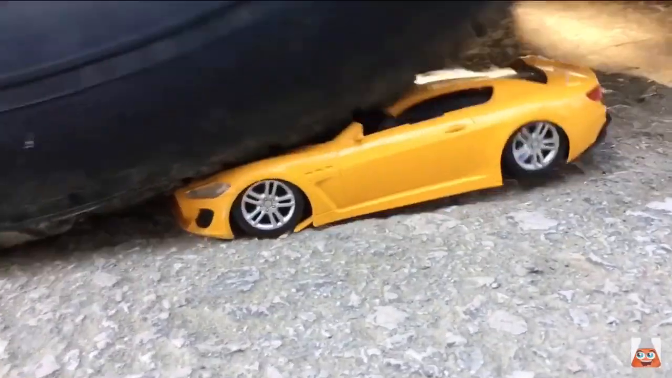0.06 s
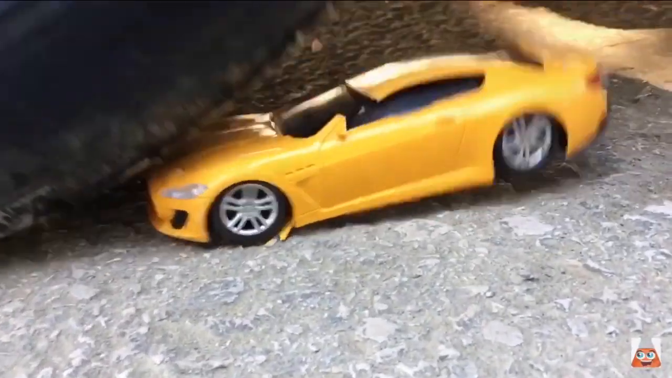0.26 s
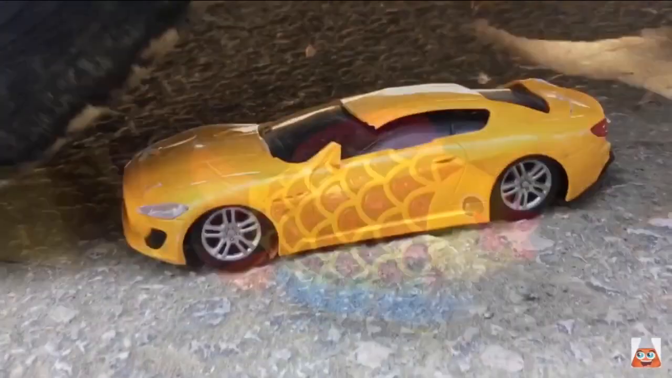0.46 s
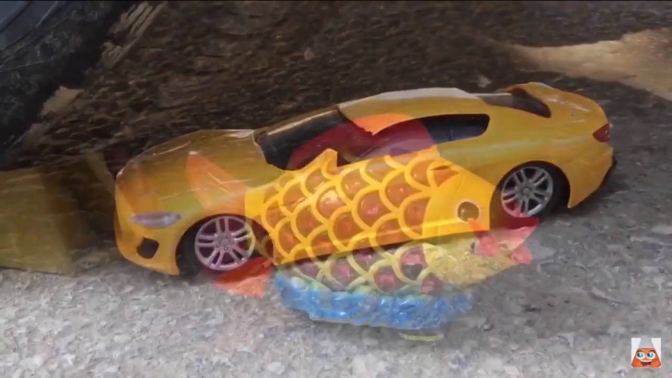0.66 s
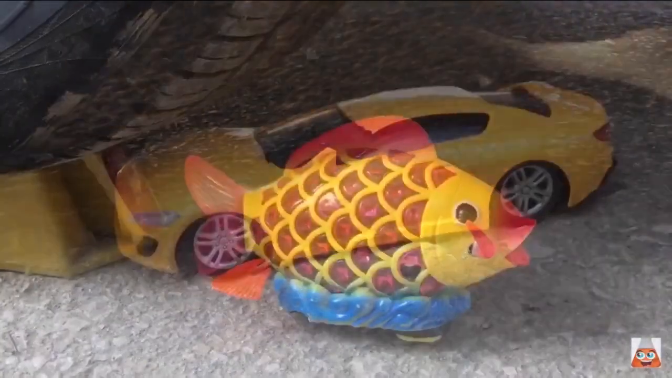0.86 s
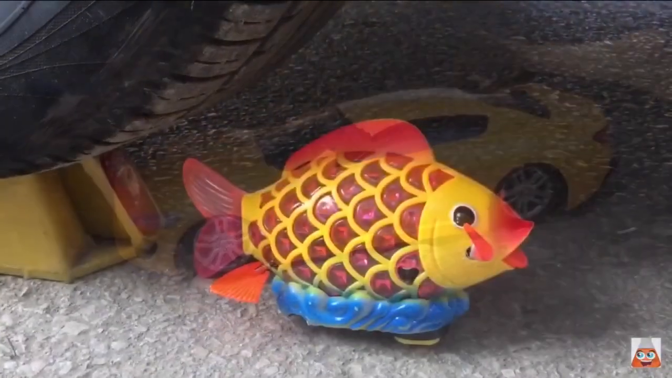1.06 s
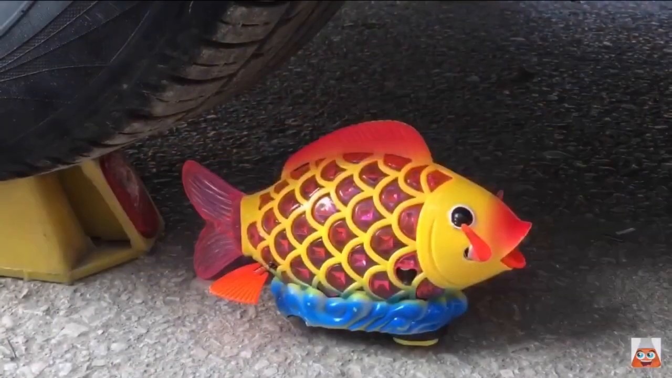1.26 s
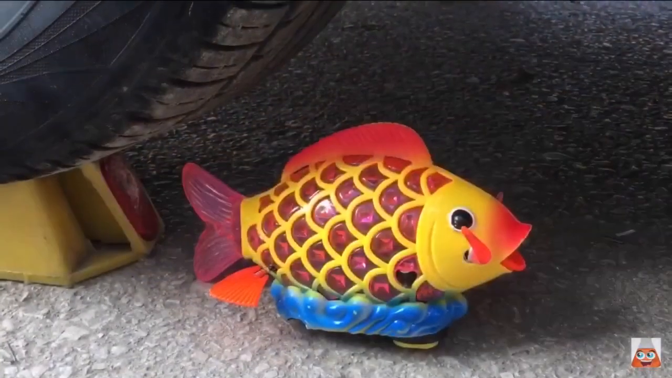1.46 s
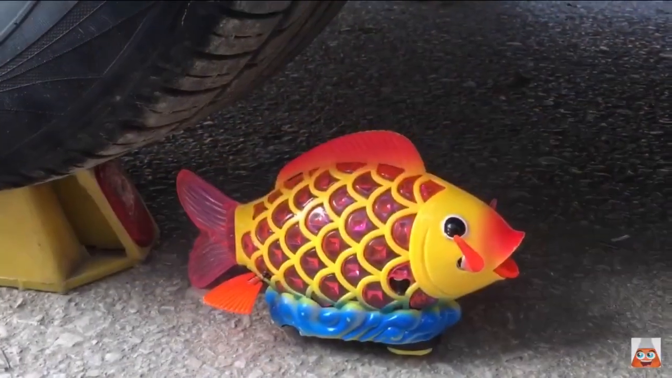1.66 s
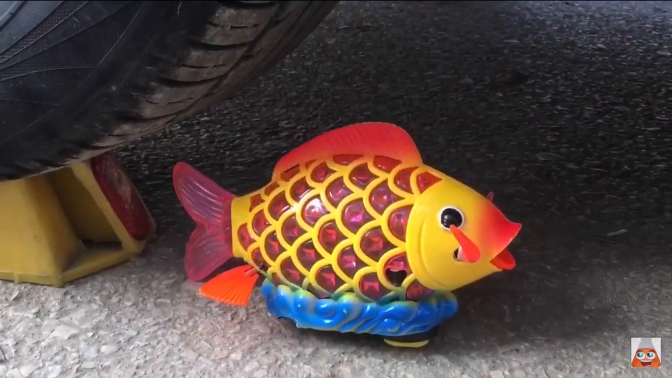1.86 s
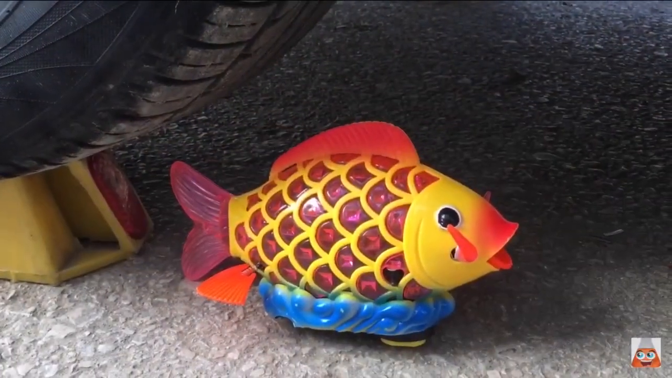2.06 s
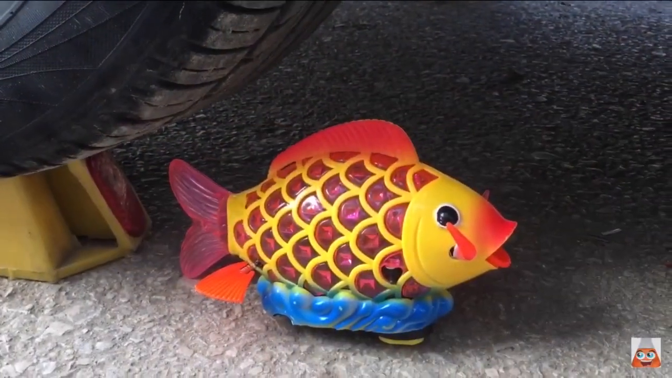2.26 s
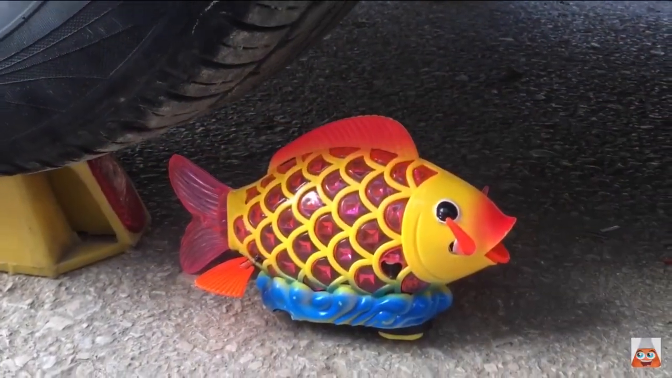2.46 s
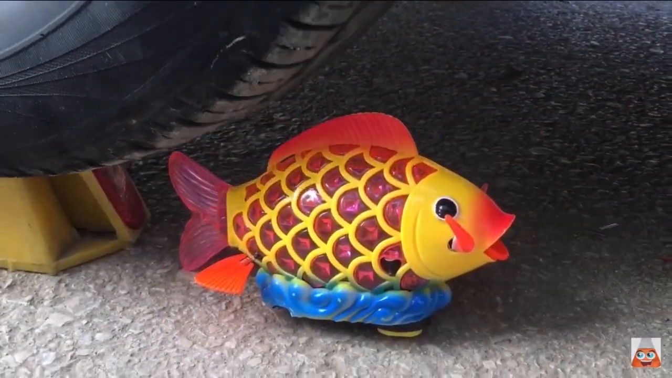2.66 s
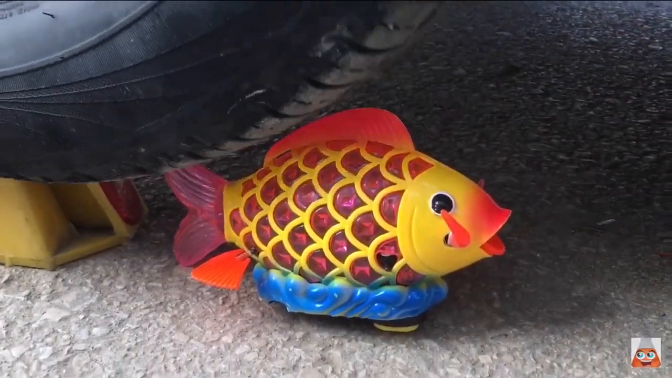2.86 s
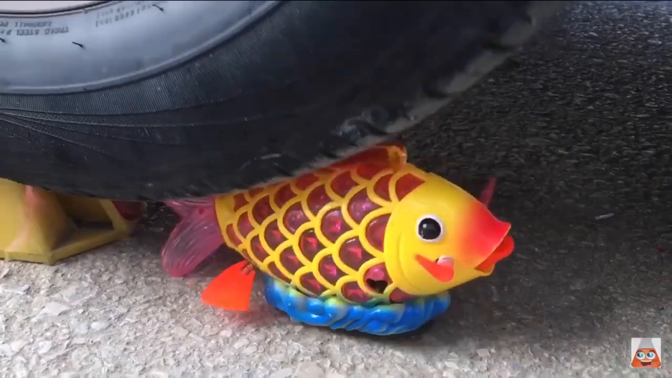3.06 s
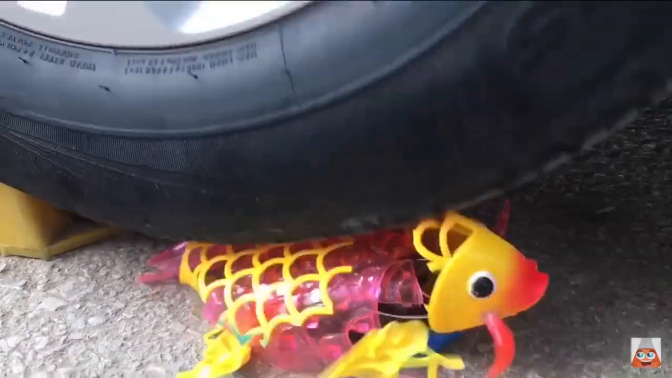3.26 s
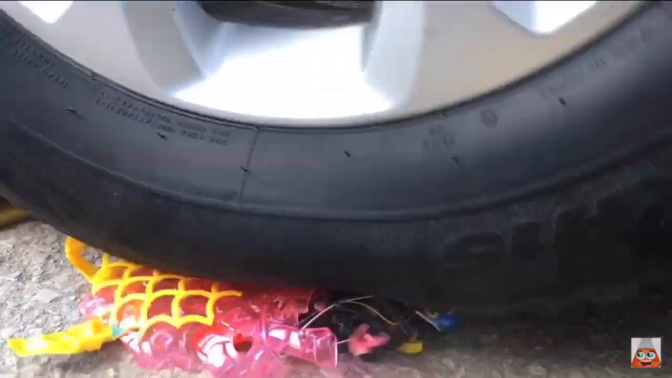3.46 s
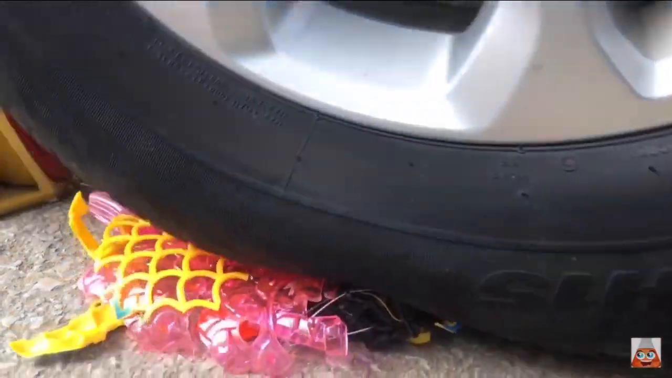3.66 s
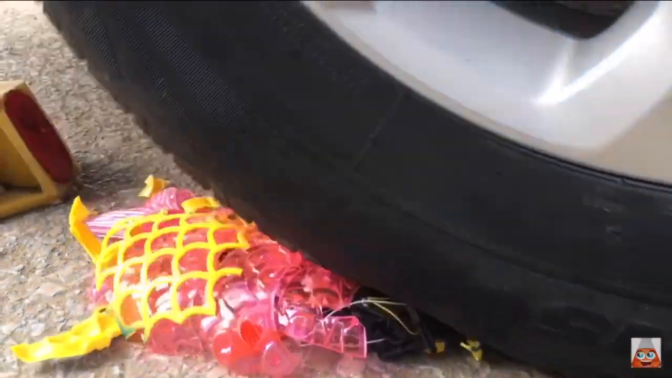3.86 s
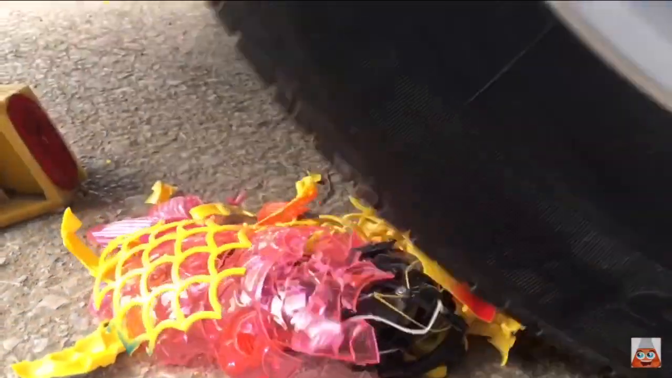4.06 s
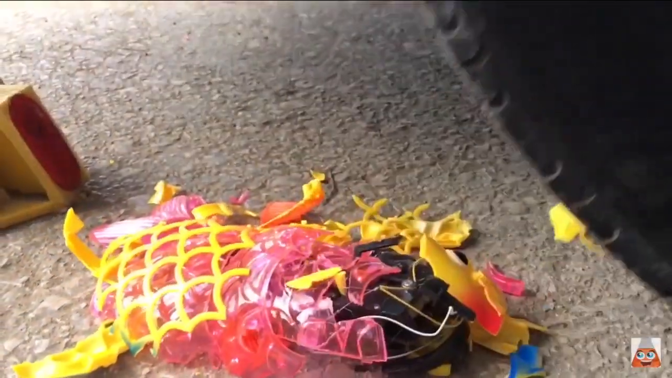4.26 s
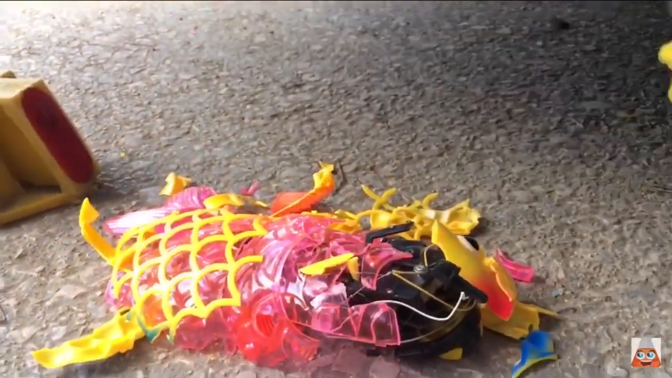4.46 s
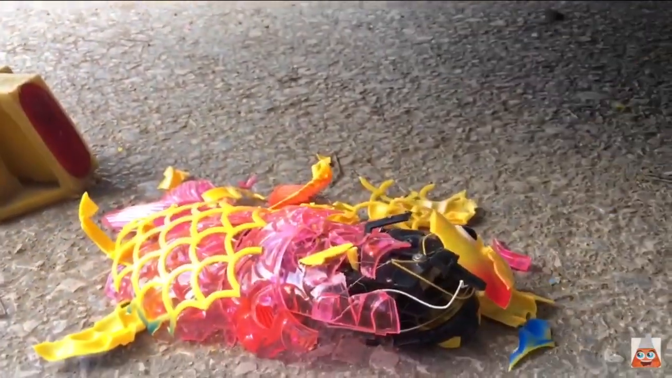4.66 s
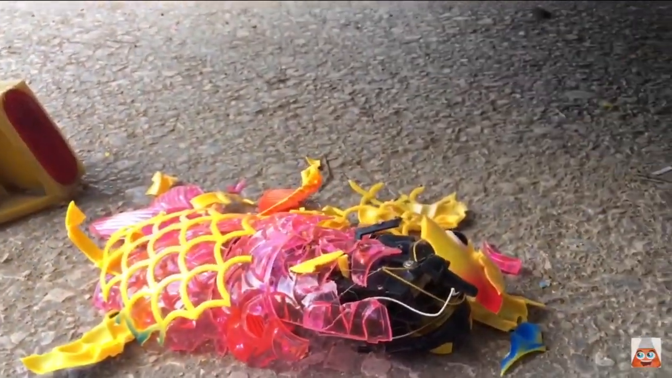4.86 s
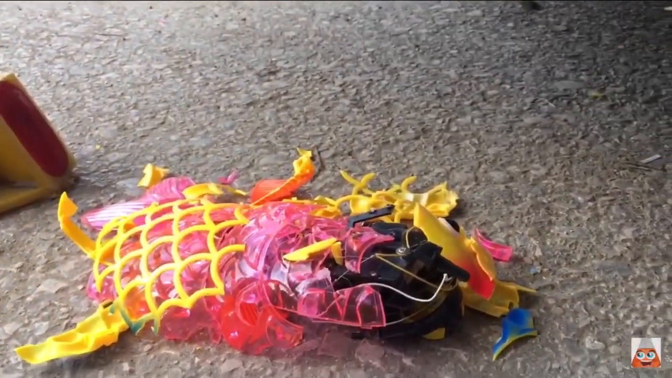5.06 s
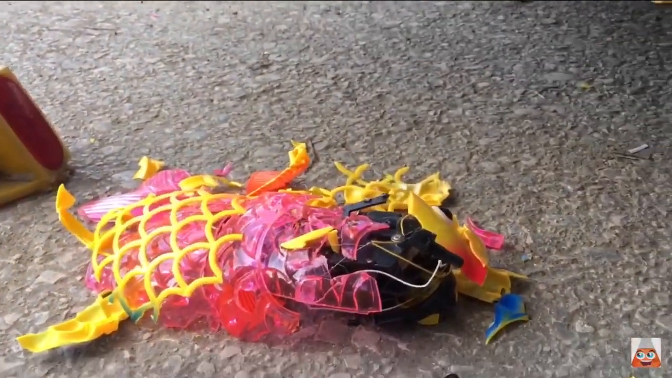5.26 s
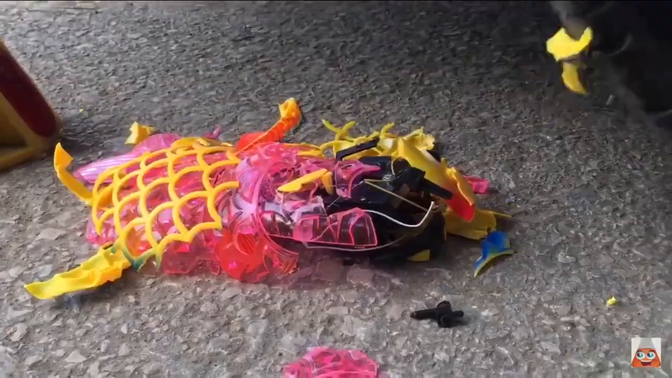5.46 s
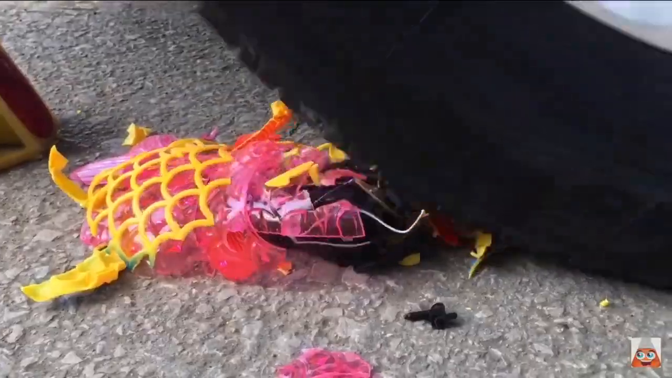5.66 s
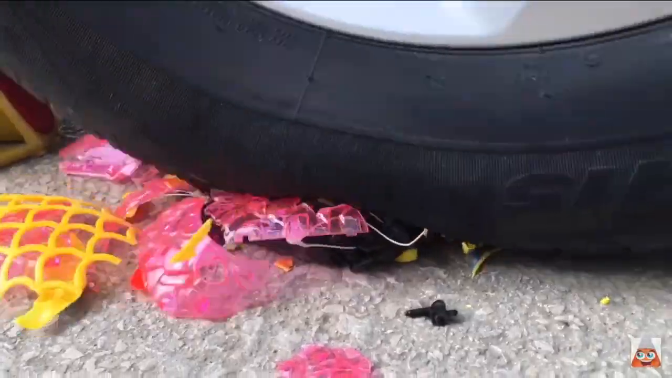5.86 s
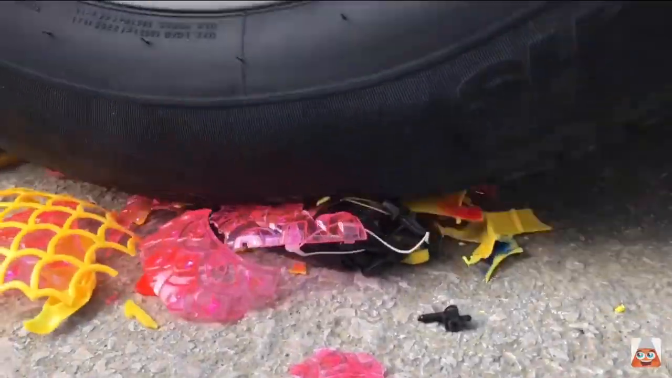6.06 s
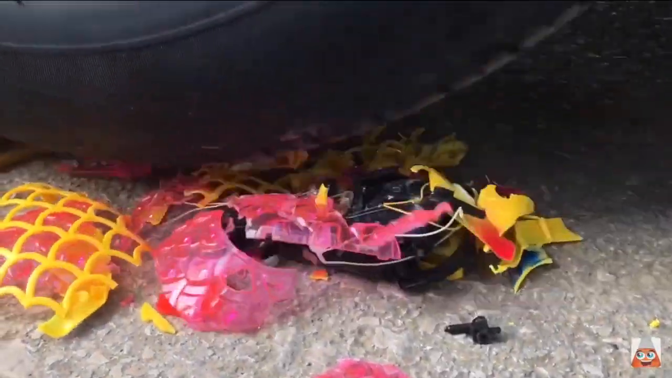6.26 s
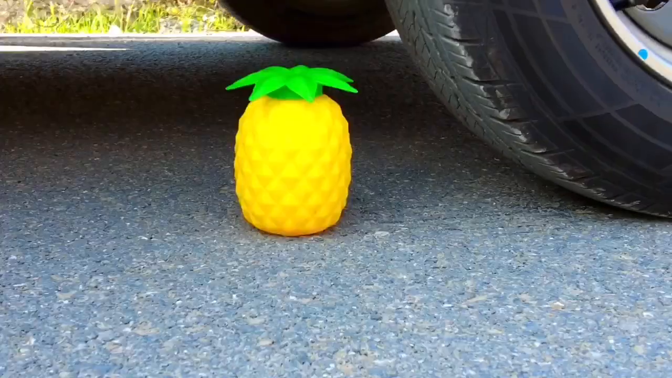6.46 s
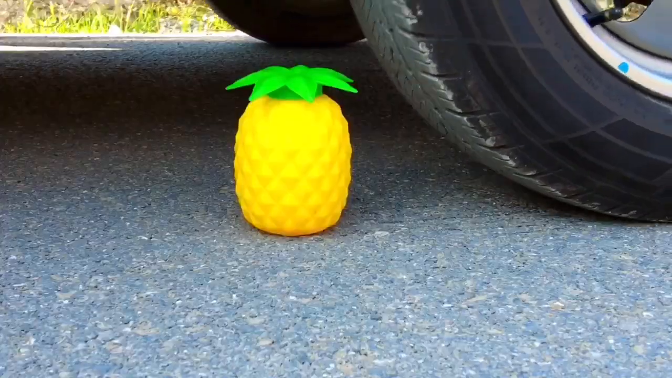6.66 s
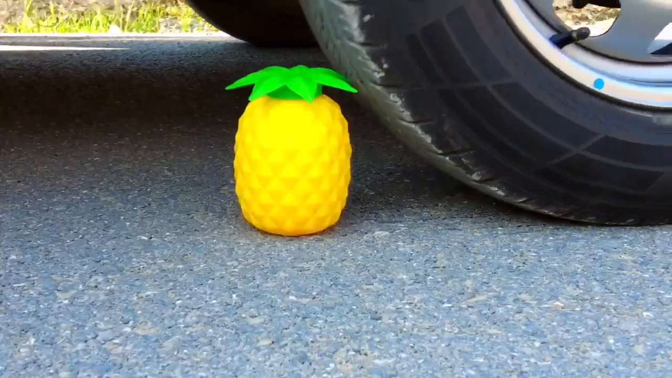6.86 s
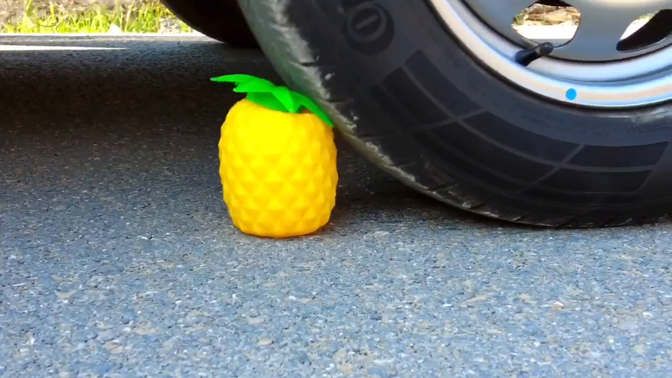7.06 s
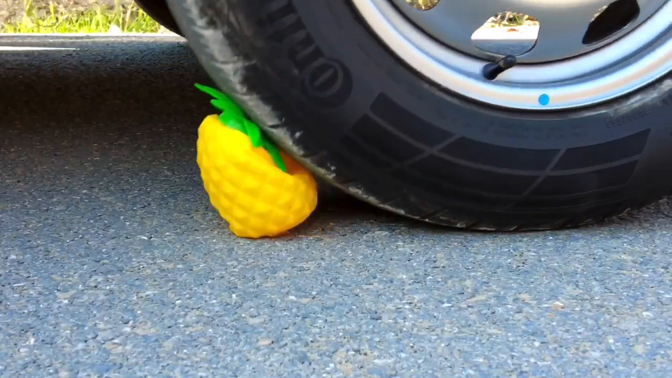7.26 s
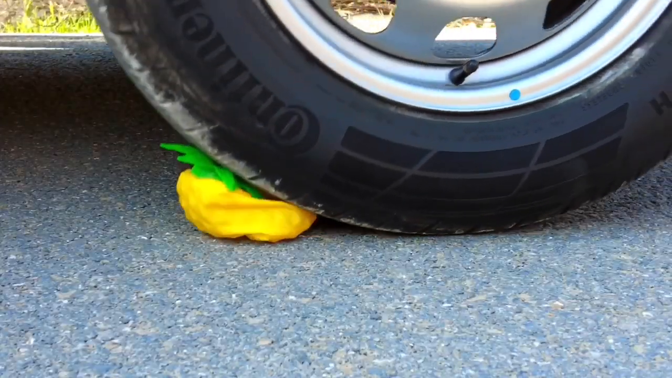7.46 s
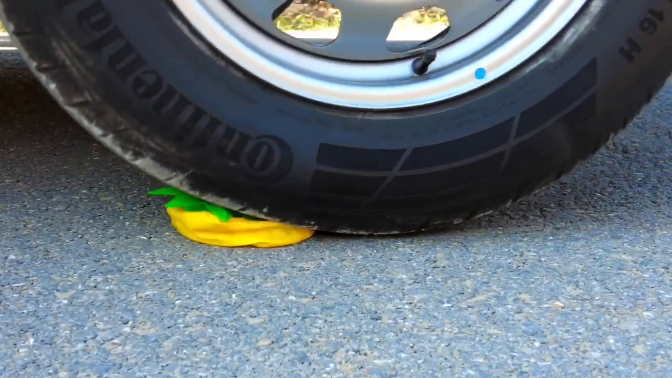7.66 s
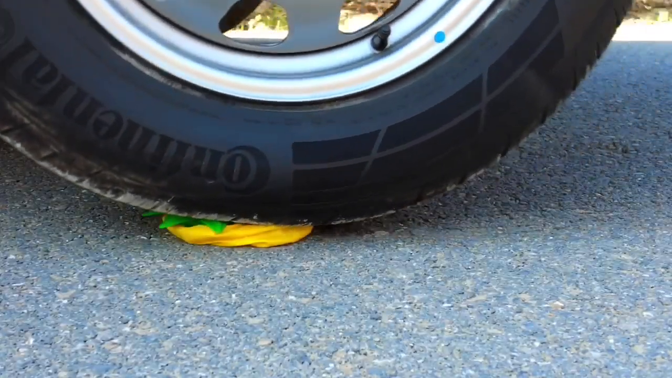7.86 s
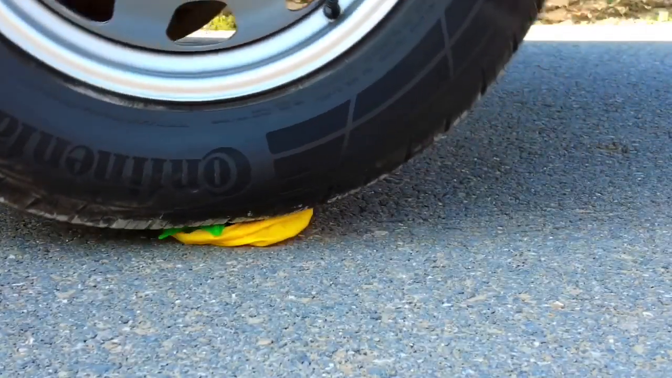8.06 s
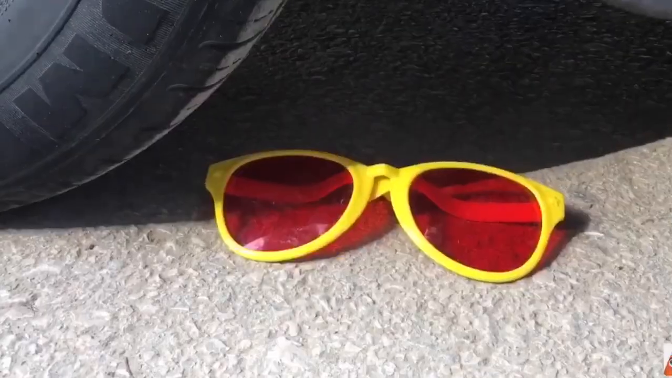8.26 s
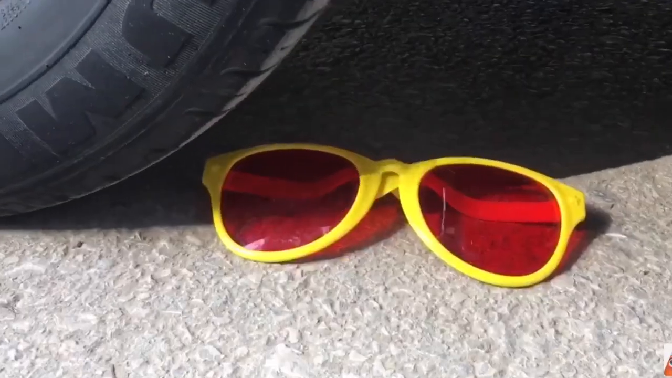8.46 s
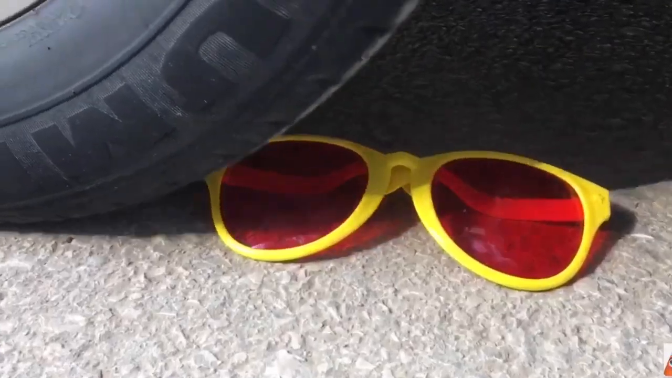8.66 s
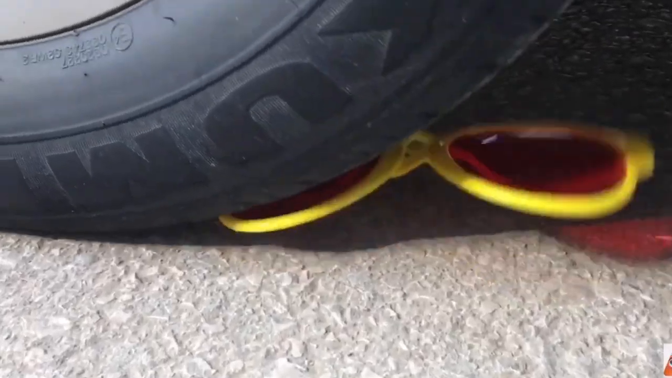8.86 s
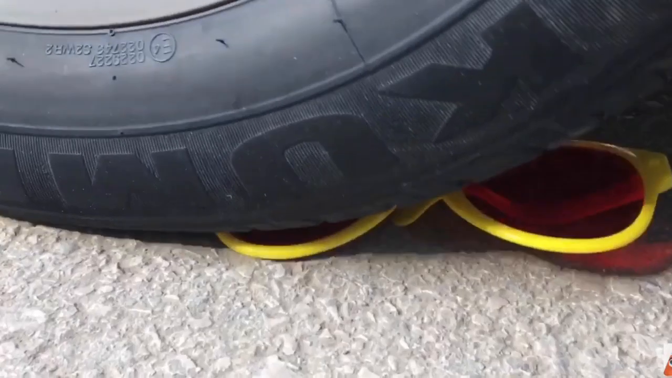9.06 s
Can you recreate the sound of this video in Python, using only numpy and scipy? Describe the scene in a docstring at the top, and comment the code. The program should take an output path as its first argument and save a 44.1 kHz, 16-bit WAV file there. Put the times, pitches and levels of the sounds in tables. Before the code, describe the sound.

A diesel idles with rapid, rattling knocks, close and mono, under low wind buffeting. At 0-0.35 s brittle plastic snaps sharply, with a small tick near 0.6. Engine clatter and soft wind thumps continue until 2.84, when a hollow plastic toy collapses: dense, overloaded cracks, low puffs of air, splinters and ringing chips until 3.45. The crunching thins through 4 s into sparse ticks; the engine is fainter, then returns with wind. At 5.32 a very faint high squeal falls, heavy wind thumps hit, and from 5.62 to 6.25 wreckage is crunched again. From 6.32 a quiet, wider roadside hums; a soft hollow toy gives dull pops at 6.87-7.4, strongest at 7.25, with small creaks and a faint hiss near 7.55. At 8.22 a louder, closer engine rattles; plastic glasses tick at 8.57, crack at 8.89, then snap violently with a huge air thump at 9.03-9.12, almost immediately cut off.

```python
"""An idling diesel clatters beside a mono microphone while a car tyre creeps over brittle plastic toys.
Five sections joined by short fades. Engine: noise gated by firings. Shells: noise bursts through resonances,
ringing shards, falling puffs and random debris. Wind buffets and shoves; loud peaks clip in overload.
The fourth section is a quiet stereo roadside: a hollow soft toy pops and crumples over a far hum."""
import sys
import numpy as np
from scipy import signal
from scipy.fft import rfft, irfft, next_fast_len
from scipy.io import wavfile
from scipy.ndimage import uniform_filter1d, map_coordinates

SR = 44100
rng = np.random.default_rng(int(sys.argv[2]) if len(sys.argv) > 2 else 0)


def wav_out(sig):
    """Save sig, one row per channel (or a flat mono array), as 16-bit PCM at SR to the path in sys.argv[1]."""
    wavfile.write(sys.argv[1], SR, np.round(np.clip(np.atleast_2d(sig).T, -1, 1) * 32767).astype(np.int16))


N = 402191

# Sections of the scene: start_s, end_s, fade_in_s, fade_out_s
SECTIONS = [(0, 3.45, 0.0016, .04), (3.419, 5.318, 0.045, 0.05), (5.321, 6.325, .004, .03),
            (6.323, 8.22, 0.11, 0.049), (8.221, 9.536, 0.091, .01)]
# Snapping shells: start_s, split_level_db, body_db (above split), body_hz, t60_s (limited in cracks)
CRACKS = [(0.027, -13.5, -11.5, 590, 0.015), (.062, -17.5, -6, 2296, 0.035), (.073, -12, -5.5, 1290, 0.012),
          (.193, -22, 4, 2195, .03), (0.2306, -0.5, -8, 1492, 0.0057), (0.262, -20, 0, 2155, .06),
          (.272, -20, 3.5, 1450, .02), (.321, -14, -9.5, 520, 0.032), (.592, -25, 5, 2300, .06),
          (2.8397, -10, -17, 2190, 0.017), (2.8495, -13.5, -26, 1448, 0.045), (2.863, -12, -11, 964, 0.031),
          (2.875, -6.5, -2, 1550, 0.087), (2.881, 9.5, -11.5, 2055, 0.017), (2.9367, 0, -7, 745, 0.083),
          (2.9724, -4, -3, 994, 0.0066), (3.002, -5, -6.5, 917, 0.048), (3.009, -4.5, -3.5, 1845, 0.032),
          (3.0516, 15.5, -8.5, 430, 0.011), (3.074, -10, -10.5, 2140, 0.027),
          (3.0828, -9, 4.5, 1073, 0.027), (3.1107, 0, -5.5, 1760, 0.041), (3.1496, -8, -16, 2150, 0.045),
          (3.166, -4, -4.5, 2303, 0.035), (3.1783, -4.5, -9, 874, 0.097), (3.2074, -6, -12, 2163, 0.044),
          (3.224, -12, -7, 603, .028), (3.234, -8, -15, 309, .021), (3.248, -1, -12, 370, 0.027),
          (3.2565, -6.5, 1, 302, .013), (3.271, -6.5, -10, 2340, .055), (3.298, -4, -8.5, 900, 0.067),
          (3.3145, -5.5, -10, 306, .05), (3.327, -4.5, -8.5, 600, 0.064), (3.342, -5, -10.5, 1995, 0.084),
          (3.363, -8, -12, 1985, 0.098), (3.3826, -5.5, -5.5, 541, 0.041), (3.3918, -6, -16, 958, 0.11),
          (3.4031, -7, -8, 571, 0.046), (3.474, -26, 4, 800, .01), (3.491, -11, -32, 733, .0094),
          (3.511, -5.5, -7.5, 674, 0.01), (3.5486, -12, 0, 656, 0.011), (3.559, -21, 8.5, 750, .012),
          (3.5816, -20.5, -5, 727, 0.065), (3.6113, -6, -12.5, 298, .014), (3.6592, -19, -6.5, 2320, 0.024),
          (3.7107, -2.5, -8, 848, .014), (3.7367, -16, -34, 1650, 0.02), (3.7658, -0.5, -3, 436, 0.016),
          (3.8, -7.5, -12.5, 900, 0.0042), (3.8145, -24.5, -6, 2300, .069), (3.91, -7.5, -34, 2290, 0.018),
          (3.934, -19, -25, 2290, .013), (3.944, -18, -17.5, 2200, 0.0076),
          (4.1268, -22.5, -15, 2140, 0.038), (4.3515, -22.5, -18, 300, 0.035),
          (4.4122, -18.5, -6.5, 1120, 0.018), (4.4716, -19.5, -7.5, 2213, 0.0046),
          (4.992, -20, -5, 1930, 0.05), (5.1281, -13, 14, 680, .02), (5.6227, -10, -9.5, 301, 0.14),
          (5.6452, 6, -10, 300, .012), (5.671, 2.5, -4.5, 298, 0.012), (5.6792, 8, -13, 296, 0.0062),
          (5.689, -6.5, -7, 307, 0.012), (5.7026, -6.5, -4, 305, 0.018), (5.7507, -14.5, -10.5, 2307, .077),
          (5.761, -4.5, -17, 876, 0.027), (5.8, -14, -24, 379, 0.1), (5.818, -4.5, -6.5, 855, 0.013),
          (5.8592, -3.5, 5, 650, 0.011), (5.8897, -6, 0, 936, 0.011), (5.8986, -3.5, -10, 650, .0073),
          (5.9154, -10, 1.5, 684, 0.029), (5.9334, -6.5, -16.5, 670, 0.014), (5.971, -3.5, 0, 291, 0.007),
          (5.9857, -15.5, -10, 2010, 0.0091), (6.017, -10, -14, 997, 0.01),
          (6.032, -19.5, -15.5, 1340, .02), (6.0463, -2.5, -13.5, 1120, 0.018),
          (6.055, -7, -10.5, 2010, .019), (6.0884, -16.5, -4.5, 368, .018), (6.1529, -17.5, 1.5, 302, 0.11),
          (6.2438, -21.5, -8, 302, .12), (8.5671, -15.5, 9.5, 990, 0.042), (8.7304, -3, -17, 778, 0.022),
          (8.8871, 1, -0.5, 1523, .027), (8.9604, -18, 0, 1204, 0.086), (9.031, 9, -15, 295.5, 0.021),
          (9.042, -2.5, 4, 289, 0.0047), (9.0496, 5.5, -1, 2285, 0.0077), (9.065, -6, 2.5, 2020, 0.033),
          (9.094, 2, -16, 2050, .005), (9.0992, 6, -8.5, 1657, 0.022), (9.108, 2, -8.5, 1560, .025),
          (9.114, 2.5, -9, 1560, .03)]
# Debris level, one list per stretch: time_s, level_db
SHATTER = [
    [(.1, -61), (.25, -37.5), (.36, -61)],
    [(2.86, -31), (2.9, -22.5), (3.12, -24), (3.2, -19), (3.3, -18), (3.4, -20)],
    [(3.46, -46), (3.62, -38), (3.82, -42), (3.88, -46.5), (3.95, -36), (4.2, -50), (4.4, -42),
     (4.5, -60.5)],
    [(5.64, -22), (5.67, -17.5), (5.78, -28), (5.95, -31), (6.03, -40), (6.13, -35), (6.17, -22),
     (6.29, -48)],
    [(9.05, -14.5), (9.075, -43.5), (9.12, -13)],
]


def amp(db):
    """Gain of a level in dB."""
    return 10 ** (np.asarray(db) / 20)


def unit(x):
    """x at rms 1."""
    return x / np.sqrt(np.mean(x ** 2) + 1e-20)


def along(points, hz):
    """Interpolate (Hz, value) points on a log frequency axis."""
    f, v = np.transpose(points)
    return np.interp(np.log(hz + 1), np.log(f + 1), v)


def curves(tables):
    """Per-sample columns of level tables; each holds 30 ms past its ends, else -120 dB."""
    t = np.arange(N) / SR
    out = np.full((len(tables[0][0]) - 1, N), -120.)
    for rows in tables:
        s, *cols = np.transpose(rows)
        on = (t > s[0] - .03) & (t < s[-1] + .03)
        out[:, on] = [np.interp(t[on], s, c) for c in cols]
    return out


def wobble(rate_hz):
    """A smooth random curve, rate_hz knots a second."""
    knots = rng.standard_normal(int(N * rate_hz / SR) + 4)
    return map_coordinates(knots, [np.arange(N) * rate_hz / SR])


def filtered(x, response):
    """x times a response of frequency."""
    n = x.shape[-1]
    m = next_fast_len(n + 2048)
    return irfft(rfft(x, m) * response(np.fft.rfftfreq(m, 1 / SR)), m)[..., :n]


def noise(spectrum):
    """Coloured noise of rms 1."""
    return unit(filtered(rng.standard_normal(N), lambda hz: amp(along(spectrum, hz))))


def resonance(hz, centre_hz, width_hz):
    """One causal resonance, 1 at its top."""
    return 1j * hz * width_hz / (centre_hz ** 2 - hz ** 2 + 1j * hz * width_hz)


def decaying(hits, life_s):
    """Hits that each fall by 1/e in life_s."""
    return signal.lfilter([1], [1, -np.exp(-1 / (life_s * SR))], hits)


def grainy(rate_hz, spread_db, life_s):
    """Envelope of random tiny breaks, each falling by 1/e in life_s."""
    size = amp(spread_db * np.minimum(rng.exponential(size=N), 2))
    return decaying((rng.random(N) < rate_hz / SR) * size, life_s)


def wide(excite, spectrum):
    """A stereo pair of rms 1 from two unrelated signals, left-right likeness set by frequency."""
    # Left-right correlation: pitch_hz, likeness (0-1)
    likeness = [(60, 0.99), (180, 0.92), (550, 0.45), (1650, 0.55), (4970, 0.18), (15000, 0.17)]

    def mid_side(hz):
        turn = np.arccos(np.clip(along(likeness, hz), -1, 1)) / 2
        return amp(along(spectrum, hz)) * [np.cos(turn), np.sin(turn)]

    mid, side = filtered(excite, mid_side)
    return unit(np.array([mid + side, mid - side]))


def cracks():
    """A snap is a burst of splitting plastic that rings splinters; the piece that breaks off knocks below."""
    # Split pitch by time, smaller pieces higher: from_s, snap_hz
    snap_pitch = [(0, 4520), (2.8, 6003), (3.45, 7170), (4.4, 4520), (5.6, 7180), (8.2, 5340)]
    # Shards that ring: start_s, pitch_hz, level_db, t60_s
    tinkles = [(.23, 4290, -5.5, .015), (0.593, 2167, -14.5, 0.099), (.6, 445, -23.5, 0.3),
               (3.69, 10000, -30.5, .068), (4.073, 8420, -30.5, 0.24), (4.12, 8440, -31.5, 0.089),
               (4.346, 9300, -26.5, 0.058), (4.455, 3800, -24, .06), (4.468, 3700, -14, .06),
               (5.325, 3800, -25, 0.07), (6.243, 5550, -23.5, 0.082), (8.672, 800, -7.5, 0.04),
               (9.068, 832, 2, 0.047)]
    stutter_db = 4  # a split advances in jerks a few ms apart
    out, t = np.zeros(N + SR), np.arange(SR // 12) / SR
    bursts = rng.standard_normal((len(CRACKS), 3, len(t)))
    splinters = rng.standard_normal((len(CRACKS), 3))
    for (s, db, body_db, body_hz, t60_s), x, spread in zip(CRACKS, bursts, splinters):
        snap_hz = [c for start, c in snap_pitch if start <= s][-1]
        t60_s = np.clip(t60_s, .005, .12)
        fall = amp(-60 * t / t60_s) * (1 - np.exp(-t / (0.025 * t60_s)))  # long tears start softly
        rings_hz = np.clip(snap_hz * np.exp(spread * [.08, .4, .45]), 1500, 15500)

        def colour(f):
            rings = sum(resonance(f, c, 0.046 * c) for c in rings_hz)
            return resonance(f, snap_hz, 4.7 * snap_hz) ** 2 + 2.0 * rings

        jerks = amp(stutter_db * unit(uniform_filter1d(x[2], size=70)))
        split = unit(filtered(x[0], colour) * jerks)
        body = unit(filtered(x[1], lambda f: resonance(f, body_hz, 0.91 * body_hz) ** 2))
        tail = 0.028 * amp(-60 * t / 0.18)  # the ground under the car answers
        burst = split * (fall + tail) + amp(body_db) * body * fall ** 0.67
        out[round(s * SR):][:len(t)] += amp(db) * burst
    t = np.arange(SR // 6) / SR
    for (s, hz, db, t60_s), x in zip(tinkles, rng.standard_normal((len(tinkles), len(t)))):
        rattle = 0.71 + 0.91 * unit(uniform_filter1d(x, size=90))  # the shard chatters on the ground
        level = amp(db - 60 * t / t60_s) * (1 - np.exp(-t / 0.00086))
        out[round(s * SR):][:len(t)] += level * rattle * np.sin(2 * np.pi * hz * t)
    return out[:N]


def puffs():
    """A hollow shell caves in and pushes out air: a low tone that sags as the shell opens."""
    # Collapses: start_s, level_db
    collapses = [(2.878, -7.5), (2.938, -9), (3.052, -8), (3.111, -10), (3.172, -10), (3.208, -13),
                 (3.249, -7.5), (3.272, -11), (3.3, -9), (3.335, -11.5), (3.392, -13.5), (3.611, -18.5),
                 (3.766, -15.5)]
    start_hz, end_hz, sag_s, t60_s = 597, 55, .004, 0.13  # pitches before a 10 % scatter
    out, t = np.zeros(N + SR), np.arange(SR // 8) / SR
    turns = end_hz * t + (start_hz - end_hz) * sag_s * (1 - np.exp(-t / sag_s))
    for (s, db), pitch in zip(collapses, rng.standard_normal(len(collapses))):
        swing = np.sin(2 * np.pi * turns * np.exp(.1 * pitch))
        out[round(s * SR):][:len(t)] += amp(db - 60 * t / t60_s) * swing
    return out[:N]


def debris():
    """Countless small breaks between the big ones; each crack throws a decaying shower of them."""
    # Shard noise colour: pitch_hz, density_db (per Hz)
    shards = [(120, -30), (200, -9), (1120, -3.5), (1530, -7), (1840, -3.5), (4350, 0), (4950, -9),
              (9400, -6.5), (10300, -12.5), (12600, -6.5), (16000, -20)]
    shower_db, shower_life_s = -25.5, 0.015  # shower_db re the crack's level
    thrown = np.zeros(N)
    for s, db, *_ in CRACKS:
        thrown[round(s * SR)] = amp(db + shower_db)
    level = amp(curves(SHATTER)[0]) + decaying(thrown, shower_life_s)
    breaks = 0.35 + grainy(rate_hz=430, spread_db=6.5, life_s=0.0026)
    return level * unit(noise(shards) * breaks)


def chips(count=500):
    """Tiny decaying sines at chance moments, their level following the debris."""
    chip_hz, chip_t60_s, chip_db = 7000, .04, 2  # medians before scatter and limits; chip_db re debris
    t, at = np.arange(SR // 25) / SR, rng.integers(0, N, count)
    draws = rng.standard_normal((count, 3))
    debris_db = curves(SHATTER)[0][at]
    on = debris_db > -100
    pitch, size, life = draws[on].T[:, :, None]
    hz = np.clip(chip_hz * np.exp(.5 * pitch), 1500, 15500)
    decay_db = 60 * t / np.clip(chip_t60_s * np.exp(.5 * life), .005, .06)
    level = amp(debris_db[on, None] + chip_db + 4 * size - decay_db)
    rings = level * np.sin(2 * np.pi * hz * t)
    places = at[on, None] + np.arange(len(t))
    return np.bincount(places.ravel(), rings.ravel(), N)[:N]


def soft_toy():
    """Walls buckle with dull hollow pops; creases tick, creak and rustle; nearby ground scatters each pop."""
    # Buckling walls: start_s, level_db, pitch_hz
    pops = [(6.8665, -3.5, 1470), (6.8833, -2.5, 1370), (6.963, -24.5, 830), (7.0116, -13, 484),
            (7.0342, -4.5, 730), (7.0497, -4.5, 673), (7.1146, -21, 304), (7.1725, -26, 497),
            (7.25, 1, 750), (7.2743, -18.5, 925), (7.3245, -8.5, 676), (7.3487, -23, 1160),
            (7.371, -23, 1080), (7.3823, -25.5, 1240), (7.403, -28, 800), (7.428, -28.5, 800),
            (7.4611, -31, 2950)]
    # Creases that flick over: start_s, level_db, pitch_hz
    ticks = [(6.867, -20.5, 3480), (6.8842, -23, 3000), (7.0339, -13.5, 2980), (7.093, -41.5, 4000),
             (7.108, -42, 4000), (7.25, -39, 3000), (7.29, -47, 2700), (7.3487, -36, 2000),
             (7.371, -40, 2000), (7.3818, -38.5, 3000), (7.4033, -40, 2000), (7.4286, -44, 2200),
             (7.4625, -43.5, 4500), (7.608, -41, 1800), (7.641, -42.5, 2600), (7.715, -54, 3800),
             (7.875, -53.5, 4500), (7.9425, -51, 3500), (8.0347, -44, 5500)]
    # Creak level: time_s, level_db
    crumple = [(6.84, -62.5), (6.87, -31.5), (6.95, -45), (7.02, -36), (7.12, -47), (7.2, -48), (7.28, -44),
               (7.46, -46), (7.49, -57), (7.55, -52), (7.66, -57), (7.75, -76)]
    pop_t60_s, tick_t60_s, rustle_db = 0.0223, .02, -6  # rustle_db re creak
    out, t = np.zeros((2, N)), np.arange(SR // 10) / SR
    rise = (1 - np.exp(-t / 0.0003)) ** 2
    lean = amp([[-.6], [.6]])  # left, right
    for (s, db, hz), x in zip(pops, rng.standard_normal((len(pops), 3, len(t)))):
        wall = lambda f: resonance(f, hz, 0.4 * hz) ** 2 + .4 * resonance(f, 0.88 * hz, 1.4 * hz) ** 2
        tones = 1.76 * np.sin(2 * np.pi * hz * t) + .7 * np.sin(2 * np.pi * 1.6 * hz * t)
        ring = tones * amp(-60 * t / 0.01) + 0.77 * unit(filtered(x[0], wall))
        ring = ring * rise * amp(-60 * t / pop_t60_s)
        scatter = 0.11 * unit(filtered(x[1:], wall)) * rise * amp(-60 * t / 0.19)
        dull = filtered(ring * lean + scatter, lambda f: (1 + 1j * f / (3.5 * hz)) ** -2)
        out[:, round(s * SR):][:, :len(t)] += amp(db) * dull
    for (s, db, hz), x in zip(ticks, rng.standard_normal((len(ticks), len(t)))):
        click = unit(filtered(x, lambda f: resonance(f, hz, 1.2 * hz) ** 2))
        click = click * rise * amp(db - 60 * t / tick_t60_s)
        out[:, round(s * SR):][:, :len(t)] += click * lean
    creak_db, = curves([crumple])
    folds = 0.63 + grainy(rate_hz=210, spread_db=-5.0, life_s=.003)
    # colours: pitch_hz, density_db
    creak = wide(folds * rng.standard_normal((2, N)),
                 [(200, -12.5), (500, -8), (1500, -12.0), (2800, -16.5), (6000, -49.5)])
    rustle = wide(folds * rng.standard_normal((2, N)),
                  [(1200, -22.5), (2100, -9.5), (2800, -8.5), (3600, -7.5), (6000, -13.5), (15000, -33.5)])
    return out + amp(creak_db) * (creak + amp(rustle_db + 3 * wobble(17)) * rustle)


def sigh():
    """The last air is squeezed from the flattened toy: a short, ragged, narrow hiss."""
    # Hiss: centre_hz, width_hz, level_db
    hz, width_hz, db = (2750, 800, -48)
    centre_s, half_s = 7.548, .03  # half_s: centre to 1/e
    hiss = unit(filtered(rng.standard_normal((2, N)), lambda f: resonance(f, hz, width_hz) ** 2))
    swell = np.exp(-((np.arange(N) / SR - centre_s) / half_s) ** 2)
    return amp(db + 3 * wobble(120)) * swell * hiss


def engine():
    """Each firing knocks the block over a steady whirr; low orders drone from the pipe."""
    # Idling stretches: start_s, end_s, first_firing_s, knock_share, order2_db, order3_db (before a 3 dB cut)
    idle = [(0, 3.2, .004, 0.94, -102, -29.5), (.75, 3.44, .766, 1.2, -58, -37.5),
            (3.44, 4.9, 3.47, 0.94, -78, -47), (5.321, 6.32, 5.33, 0.34, -39, -26),
            (8.22, 9.2, 8.206, 1.8, -20, -45)]
    # Knock strength per cylinder, before scatter: strength_db
    cylinders = [11.2, 10.96, 8.45, 10.9]
    # Clatter level, one list per stretch: time_s, level_db
    clatter = [
        [(0, -31.5), (.8, -35), (1.3, -32), (2.83, -32)],
        [(3.45, -43.5), (3.88, -54.5), (4.25, -40), (4.5, -36.5), (4.9, -36.5), (5.29, -40.5)],
        [(5.35, -35), (5.6, -35), (6.29, -41.5)],
        [(8.25, -22), (8.33, -18), (9.0, -16.5), (9.12, -27)],
    ]
    # Block colour, sections 1-4: pitch_hz, density_db (per Hz)
    block_colour = [(88, -30.5), (150, 1.5), (226, -10), (341, -5), (448, -12.5), (545, -3.5), (888, -5),
                    (1310, -3.5), (1660, -6), (2140, -3), (2810, -8), (3700, -8), (8730, -16), (14800, -28),
                    (16000, -37)]
    # Block colour, last section: pitch_hz, density_db (per Hz)
    close_colour = [(88, -41), (150, -1.5), (341, -7), (475, -9), (555, -10), (612, -7), (888, -7.5),
                    (1080, -10), (2360, -6.5), (2810, -14), (3160, -9.5), (8230, -19), (16000, -33)]
    # Narrow engine tones: pitch_hz, width_hz, level_db (re clatter)
    whines = [(362.4, 54, -17.5), (546.4, 12, -20.5), (1330, 93, -13), (2353, 66, -21)]
    # Block modes rung by firings: pitch_hz, width_hz, level_db (re clatter)
    knock_modes = [(2430, 480, -16.5), (3464, 1500, -12.5), (5860, 630, -18)]
    # Faint low tone: start_s, end_s, pitch_hz, level_db
    tone_start_s, tone_end_s, tone_hz, tone_db = (3.45, 4.1, 190, -47)
    firing_hz = 25.0
    t, gate, drone = np.arange(N) / SR, np.ones(N), np.zeros(N)
    for start, end, first, share, order2_db, order3_db in idle:
        on = (t >= start) & (t < end)
        turns = (t[on] - first) * firing_hz
        age_s = turns % 1 / firing_hz
        count = np.floor(turns).astype(int) + 4  # keeps the firing index positive
        scatter_db = 1.4 * rng.standard_normal(count[-1] + 1)[count]
        size = amp(np.take(cylinders, count % 4) + scatter_db)
        knock = size * (1 - np.exp(-age_s / 0.0023)) * np.exp(-age_s / 0.029)
        gate[on] = unit(1 + share * knock)
        drone[on] = amp(order2_db) * np.sin(4 * np.pi * turns)
        drone[on] += amp(order3_db - 3.0) * np.sin(6 * np.pi * turns)
    # valves and injectors tick within the knock
    rough = unit(6.0 + grainy(rate_hz=370, spread_db=-0.5, life_s=.0012))
    block = np.where(t < SECTIONS[4][0], noise(block_colour), noise(close_colour))
    whine = filtered(rng.standard_normal(N), lambda f: sum(
        amp(db) * np.sqrt(SR / width) * resonance(f, hz, width) ** 2 for hz, width, db in whines))
    ringing = np.zeros(N)
    for hz, width, db in knock_modes:
        mode = filtered(rng.standard_normal(N), lambda f: resonance(f, hz, width) ** 2)
        ringing += amp(db + 5.14 * wobble(25)) * unit(gate ** 3 * mode)
    drone += amp(tone_db) * np.sin(2 * np.pi * tone_hz * t) * ((t > tone_start_s) & (t < tone_end_s))
    level = amp(curves(clatter)[0] + 0.5 * wobble(18))
    return level * (gate * rough * block + whine + ringing) + drone * amp(2.5 * wobble(7.4))


def brake():
    """A thin falling squeal: one sine with a jittery level."""
    # Squeal: time_s, pitch_hz, level_db (before a 2 dB cut)
    squeal = [(5.325, 13230, -48), (5.37, 12450, -55), (5.43, 11900, -56), (5.48, 11000, -64)]
    t, (s, hz, db) = np.arange(N) / SR, np.transpose(squeal)
    level = amp(np.interp(t, s, db, -120, -120) - 2 + 4.75 * wobble(90))
    return level * np.sin(2 * np.pi * np.cumsum(np.interp(t, s, hz)) / SR)


def wind():
    """Lumpy buffeting, and single shoves of air that swing a few times and flutter."""
    # Wind level, one list per stretch: time_s, buffet_db, flutter_db (above buffet)
    gusts = [
        [(0.0, -32, -6), (3.29, -34.5, -4.5), (3.39, -41, 22)],
        [(3.45, -51, 10.5), (3.684, -46.5, -8.5), (5.29, -26.5, -7.5)],
        [(5.35, -28, 1), (5.556, -25.5, -8.5), (6.29, -33, 4)],
        [(8.25, -36, 9.5), (8.466, -23.5, -2), (9.12, -25, -2)],
    ]
    # Buffet colour: pitch_hz, density_db (per Hz)
    rumble_colour = [(20, -41), (45, 10), (90, 7), (140, -7.5), (250, -57)]
    # Flutter colour: pitch_hz, density_db (per Hz)
    flutter_colour = [(80, -35), (140, -1.5), (300, -8.5), (600, -21.5), (1200, -60)]
    # Air shoved at the microphone: centre_s, level_db, length_s
    thumps = [(0.12, -26, .032), (0.472, -23.5, .079), (0.658, -21, 0.063), (0.711, -24.5, .016),
              (1.466, -25, .021), (2.275, -24, 0.028), (2.365, -21, .046), (2.427, -21, 0.037),
              (2.529, -20, 0.036), (4.317, -26, .041), (4.73, -22.5, .051), (4.87, -19.5, 0.019),
              (5.118, -21.5, 0.021), (5.385, -4, 0.049), (5.495, -11, .014), (5.555, -11.5, 0.067),
              (5.589, -9.5, 0.042), (5.646, -4, 0.071), (5.712, -5.5, 0.048), (5.802, -11, .012),
              (5.975, -13, 0.033), (6.085, -4, 0.011), (6.159, -10.5, .033), (6.279, -8.5, 0.041),
              (9.046, 9, .055)]
    thump_hz, thump_spread = 83.4, 0.13  # typical pitch mid-shove, log scatter
    buffet_db, flutter_db = curves(gusts)
    flutter = noise(flutter_colour)
    out = amp(buffet_db) * unit(noise(rumble_colour) * amp(3.4 * wobble(16)))
    out += amp(buffet_db + flutter_db) * unit(flutter * amp(4.84 * wobble(30)))
    steps = np.arange(-SR // 12, SR // 12)
    t = steps / SR
    for (s, db, length_s), (turn, pitch) in zip(thumps, rng.standard_normal((len(thumps), 2))):
        at = np.clip(round(s * SR) + steps, 0, N - 1)
        hz = thump_hz * np.exp(thump_spread * pitch)
        turns = hz * .03 * (1 - np.exp(-t / 0.0296)) + turn  # slows as the eddy spreads
        swing = np.cos(2 * np.pi * turns)
        bump = np.exp(-(t / (0.31 * length_s)) ** 2)
        out[at] += amp(db) * bump * (swing + 0.28 * flutter[at])
    return out


def roadside():
    """Far traffic wash of coloured noise with two slightly unsteady tones."""
    # Wash colour: pitch_hz, density_db (per Hz)
    road_colour = [(18, -35), (30, -2.5), (76, -10.5), (94, -13.5), (129, -16), (716, -28), (905, -37.5),
                   (1300, -29), (2370, -44.5), (4090, -50.5), (4650, -51.5), (7060, -57), (14000, -55),
                   (16000, -70)]
    # Tone levels: time_s, low_db (before a 1 dB cut), high_db (before a 4.5 dB boost)
    hum_levels = [(6.3, -39, -53), (6.83, -36.5, -51), (6.86, -39, -73), (8.0, -42.5, -67),
                  (8.2, -40.5, -56)]
    # Tone pitches: low_hz, high_hz
    low_hz, high_hz = [69.5, 346]
    road_db = -46.5
    t, (low_db, high_db) = np.arange(N) / SR, curves([hum_levels])
    low = amp(low_db - 1.0 + 2.4 * wobble(5.1)) * np.sin(2 * np.pi * low_hz * t + 0.26 * wobble(5))
    high_phase = 2 * np.pi * high_hz * t + 0.5 * wobble(6) + np.array([[.5], [-.5]])  # left, right
    high = amp(high_db + 4.5 + 2.2 * wobble(8)) * np.sin(high_phase)
    wash = amp(road_db + 0.42 * wobble(1.3)) * wide(rng.standard_normal((2, N)), road_colour)
    return (wash + low + high) * ((t > SECTIONS[3][0]) & (t < SECTIONS[3][1]))


def scene():
    """Sum of the mono layers and the stereo soft toy and roadside."""
    shells = cracks() + puffs() + debris() + chips()
    toy = soft_toy() + sigh()
    car = engine() + brake()
    return shells + toy + car + wind() + roadside()


def record(dry):
    """Hard overload, fades at each join, and the band limit."""
    top_hz = 16000
    t = np.arange(N) / SR
    fade = np.zeros(N)
    for start, end, fade_in_s, fade_out_s in SECTIONS:
        ramp = np.minimum((t - start) / (fade_in_s + 1e-4), (end - t) / fade_out_s)
        fade += np.clip(ramp, 0, 1)
    clipped = np.clip(dry, -1, 1)
    limited = filtered(clipped * fade, lambda hz: np.where(hz < top_hz, 1, .004))
    return np.clip(limited, -1, 1)


dry = scene()
out = record(dry)
wav_out(out)
```